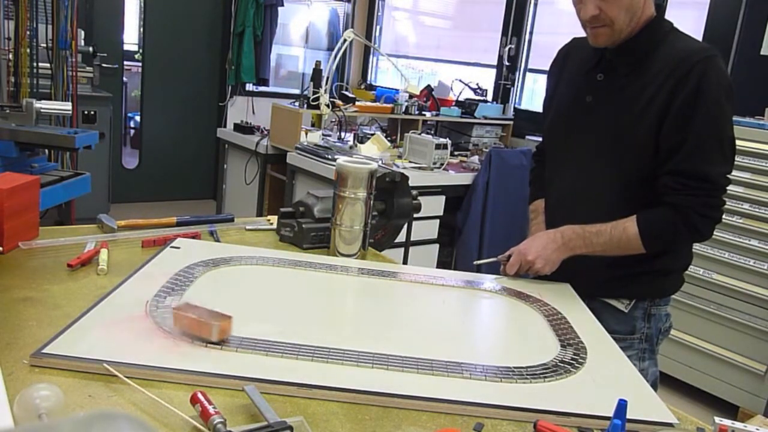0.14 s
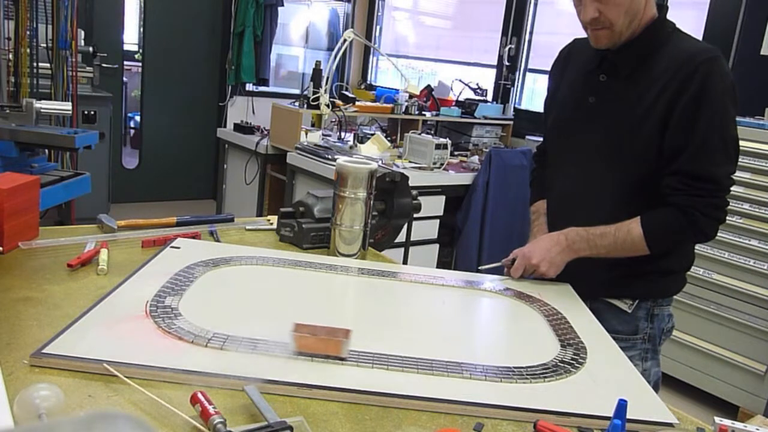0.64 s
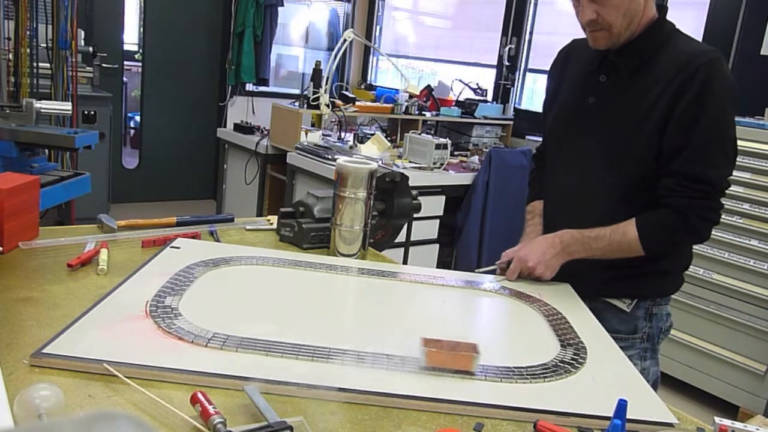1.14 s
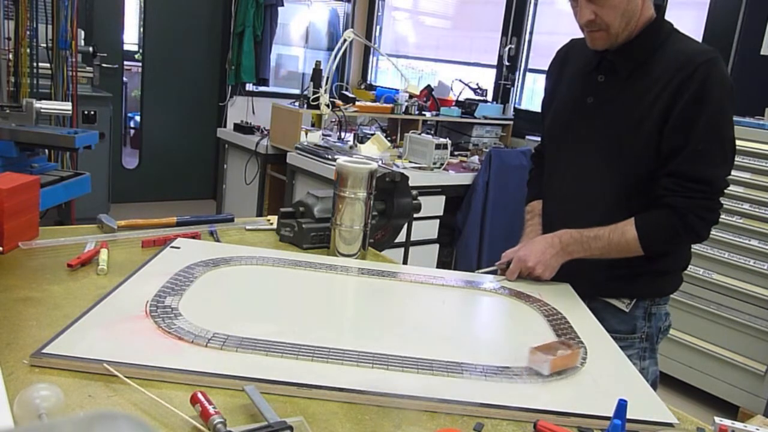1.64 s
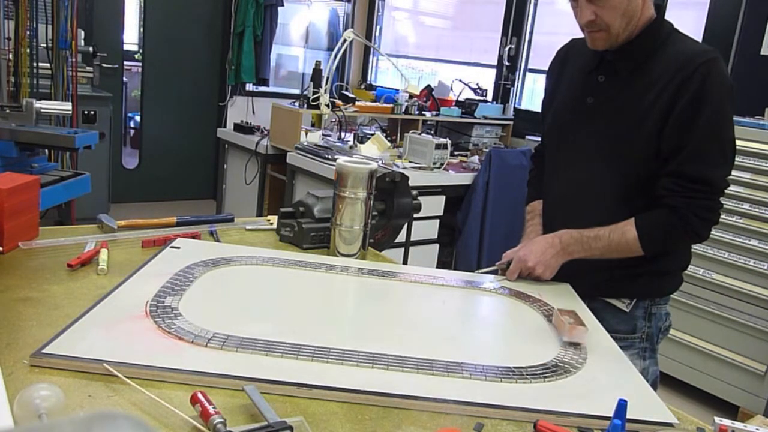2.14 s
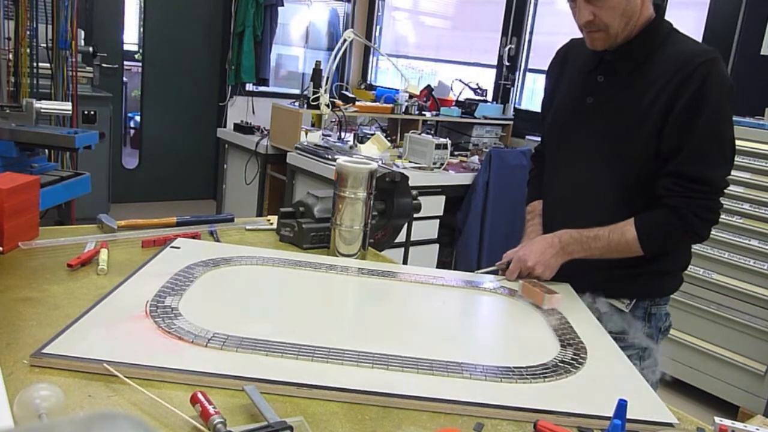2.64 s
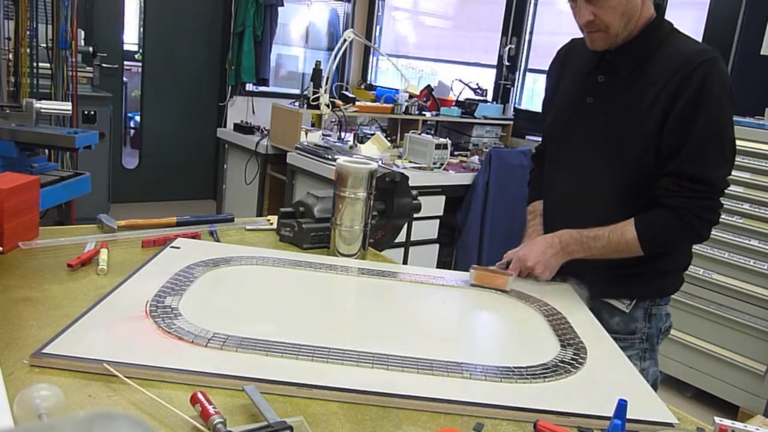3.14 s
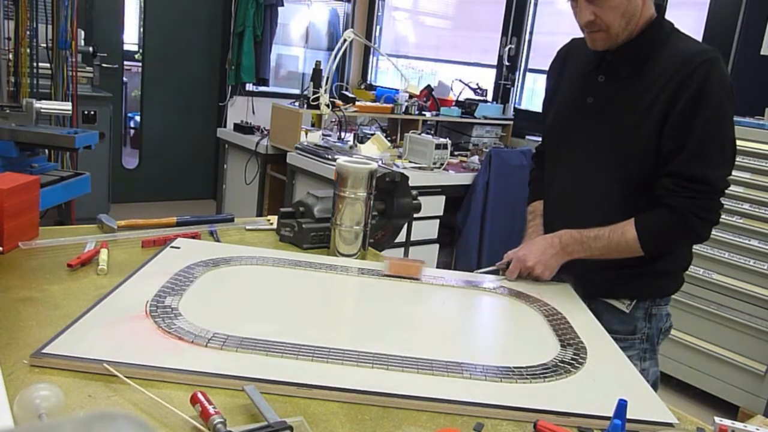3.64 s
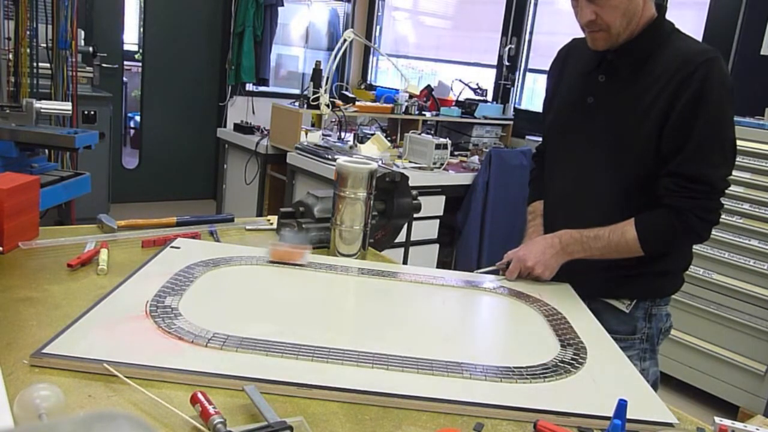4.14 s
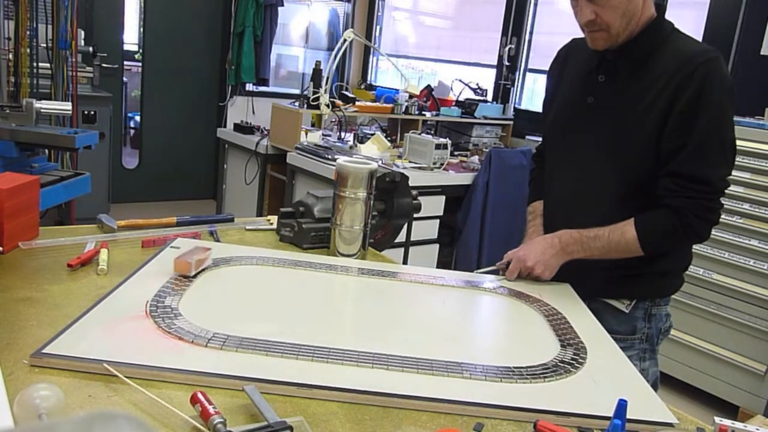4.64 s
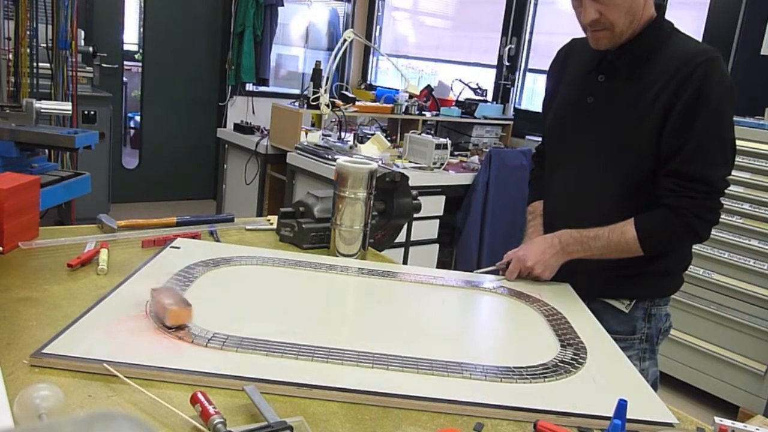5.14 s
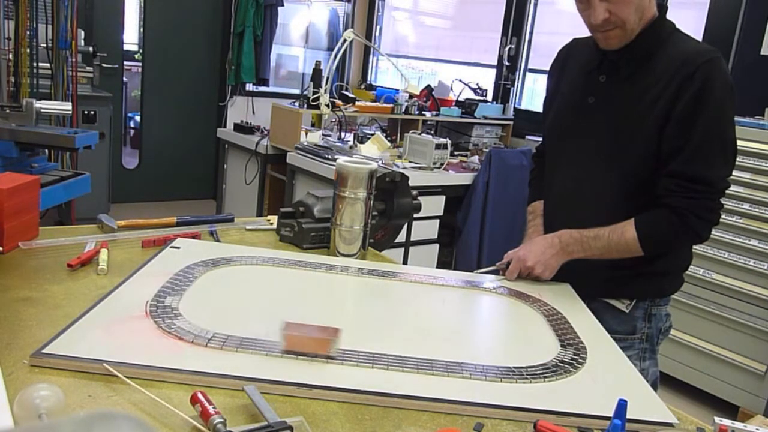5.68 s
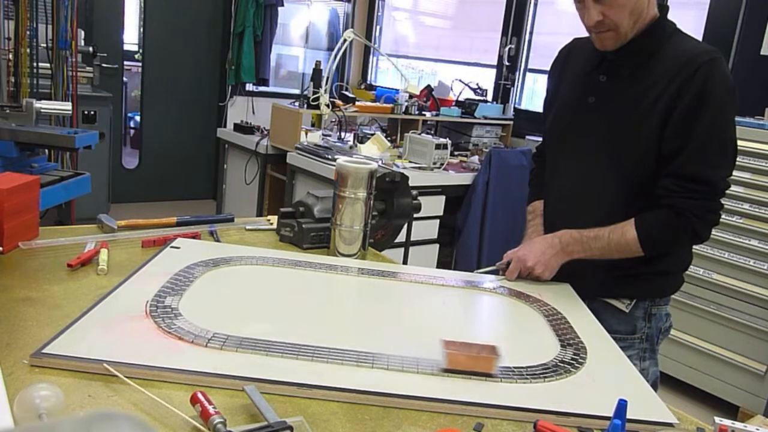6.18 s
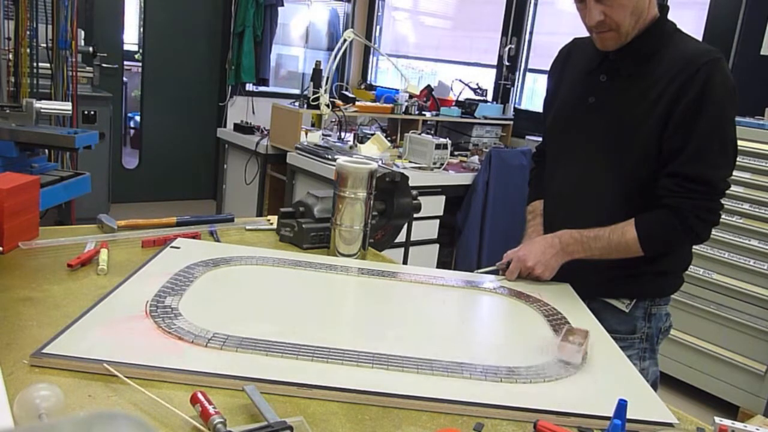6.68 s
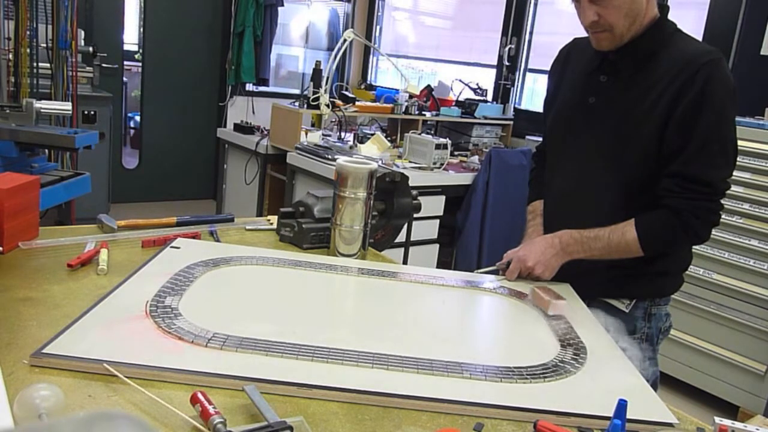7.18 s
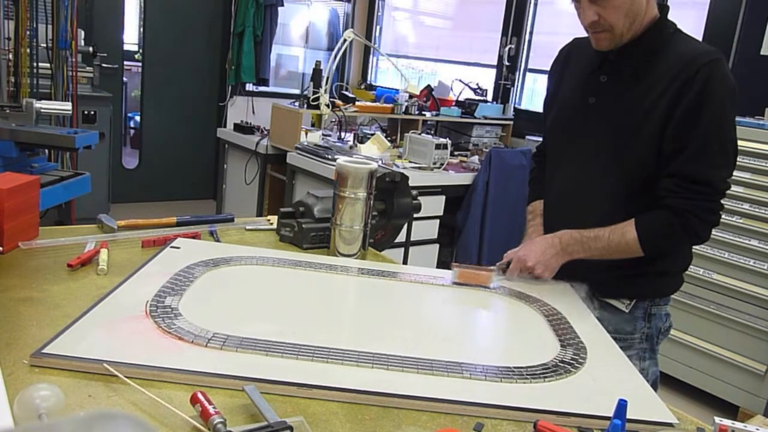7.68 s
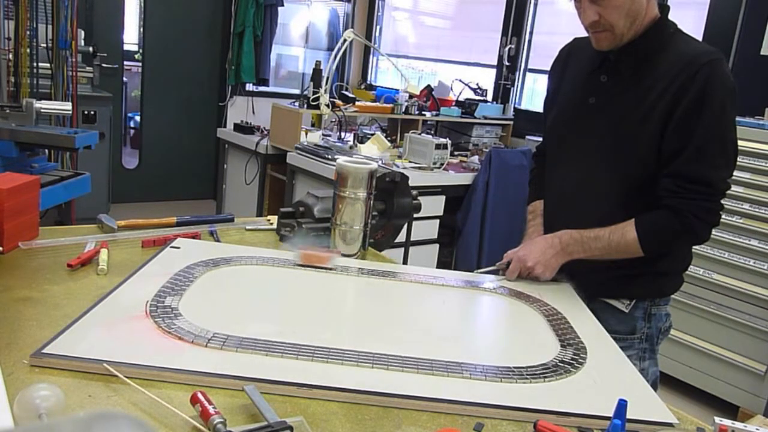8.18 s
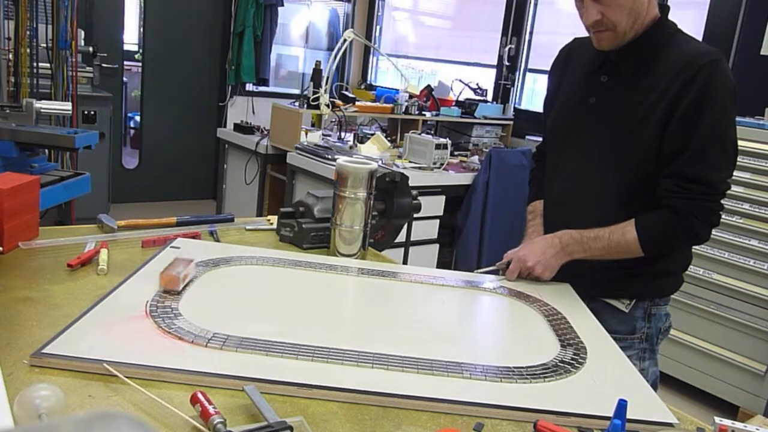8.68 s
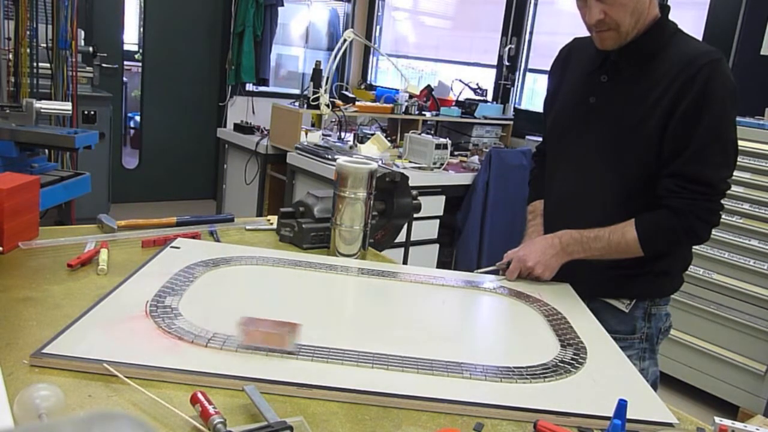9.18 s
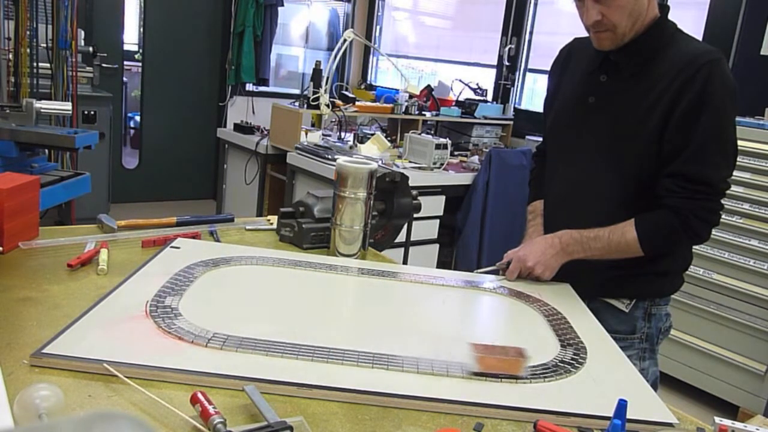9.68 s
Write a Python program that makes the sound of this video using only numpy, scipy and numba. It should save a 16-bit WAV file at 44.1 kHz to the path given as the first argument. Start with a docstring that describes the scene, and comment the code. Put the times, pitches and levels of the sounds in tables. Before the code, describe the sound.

In a workshop, low ventilation rumble runs alone for a second. A soft thud at the air gun, then a thin leak opens into a full bright hiss. It breaks off briefly, returns, dips once and holds. Twice a small open box crosses the jet, making a tearing roar that ends in a hollow boom. Small camera microphone a few metres away, treble cut off.

```python
"""Air gun and open box in a workshop

A hand-held air gun hisses over a table: a leak, then a full jet (shaped noise) with one break and one dip.
Twice a small open box runs through the jet: band-passed noise roars on its edges and booms in its hollow.
Table top and walls echo it (delays) over a low ventilation rumble; a small camera stands a few metres off."""
import sys
import numpy as np
from scipy import signal
from scipy.fft import rfft, irfft, next_fast_len
from scipy.io import wavfile
from scipy.ndimage import uniform_filter1d
from numba import njit

SR = 44100
rng = np.random.default_rng(int(sys.argv[2]) if len(sys.argv) > 2 else 0)


def voltage_ratio(decibels):
    """Convert decibels (scalar or array-like) to amplitude ratios, 20 dB per decade."""
    exponent = np.asarray(decibels, float) / 20
    return 10 ** exponent


def materialize(psi):
    """Save the field psi as 16-bit PCM at rate SR to the path in sys.argv[1].

    A 1-D psi becomes a single channel; in a 2-D psi each row is a channel.
    """
    bounded = np.clip(np.atleast_2d(psi).T, -1, 1)
    quanta = np.round(bounded * 32767).astype(np.int16)
    wavfile.write(sys.argv[1], SR, quanta)


N = 432621
T = np.arange(N) / SR


def unit(x):
    """Scale to rms 1."""
    return x / np.sqrt(np.mean(x ** 2))


def coloured(points):
    """Noise with a spectrum of (f/Hz, density/dB) points, straight in log f, rms 1."""
    hz, db = np.transpose(points)
    size = next_fast_len(N)
    bins_hz = np.arange(1, size // 2 + 2) * SR / size
    gain = voltage_ratio(np.interp(np.log(bins_hz), np.log(hz), db))
    white = rng.standard_normal(size)
    return unit(irfft(rfft(white) * gain, size)[:N])


def curves(rows):
    """Columns of a time table, read at every sample."""
    s, *columns = np.transpose(rows)
    return [np.interp(T, s, c) for c in columns]


def walk(rate_hz):
    """Random levels held 1 / rate_hz and slewed twice; spread near 1."""
    hold = int(SR / rate_hz)
    steps = np.repeat(rng.standard_normal(N // hold + 1), hold)
    return 0.87 * uniform_filter1d(uniform_filter1d(steps, hold), hold)[:N]


@njit
def svf(x, hz, width):
    """State-variable band-pass whose centre and width may move, gain 1 at the centre."""
    y, b, l = np.empty(len(x)), 0., 0.
    for i in range(len(x)):
        g, k = np.tan(np.pi * hz[i] / SR), width[i] / hz[i]
        v = (b + g * (x[i] - l)) / (1 + g * (g + k))
        b, l, y[i] = 2 * v - b, l + 2 * g * v, k * v
    return y


def noise_band(hz, width_hz, second_width_hz):
    """White noise through two band-passes at one fixed or moving centre."""
    still = np.zeros(N)
    once = svf(rng.standard_normal(N), hz + still, width_hz + still)
    return svf(once, hz + still, second_width_hz + still)


def along(enter_s, leave_s):
    """How far the box has gone through the jet, in box lengths."""
    return (T - enter_s) / (leave_s - enter_s)


# rumble level: t/s, level/dB
SHOP_LEVEL = [(0, -42.5), (2.1, -44.5), (2.6, -41.5), (5.4, -42.5), (6.0, -46), (9.81, -45)]
# middle of the background, relative spectrum: f/Hz, density/dB
RUMBLE_SPECTRUM = [(12, -51), (20, -19), (69, -17), (178, -4.5), (233, -2.5), (306, -10.5), (338, -8),
                   (374, -13), (413, -12), (445, -14), (1920, -33), (5450, -35), (7520, -48), (9780, -83),
                   (16500, -120)]
# side of the background, relative spectrum: f/Hz, density/dB
WIDE_SPECTRUM = [(12, -49.5), (20, -21.5), (227, -11), (491, -11), (529, -10), (1320, -12.5), (1500, -18),
                 (1780, -12.5), (2340, -16), (4810, -20.5), (7520, -37), (9780, -69), (16500, -120)]
WIDE_DB = -8  # side against middle


def shop():
    """Ventilation rumble in the middle; the faint hiss above it spreads wide, partly out of phase."""
    level = voltage_ratio(curves(SHOP_LEVEL)[0] + 1.0 * walk(2.1))
    side = voltage_ratio(WIDE_DB) * coloured(WIDE_SPECTRUM) * np.array([[1], [-1]])
    return level * (coloured(RUMBLE_SPECTRUM) + side)


@njit
def walls(x, lags, gain, damp):
    """Eight delay lines that feed each other, duller on every round."""
    line, soft, out = np.zeros((8, 4096)), np.zeros(8), np.zeros((2, len(x)))
    for i in range(len(x)):
        total = 0.
        for k in range(8):
            soft[k] += (1 - damp) * (gain[k] * line[k, (i - lags[k]) & 4095] - soft[k])
            total += soft[k]
            out[k % 2, i] += soft[k]
        for k in range(8):
            line[k, i & 4095] = x[i] + soft[k] - total / 4
    return out


# early echoes off table, body and benches: delay/ms, left gain, right gain
EARLY_ECHOES = [(0.977, 0.11, 0.021), (2.39, 0.024, 0.017), (2.68, 0.024, 0.018), (6.716, 0.014, 0.032),
                (7.2, 0.016, 0.014), (8.5, 0.038, 0.027), (9.23, 0.028, 0.028), (21.7, 0.055, 0.056)]
ROOM_T60_S, ROOM_DAMP, ROOM_DB = 0.33, 0.12, -12.5  # T60 before damping
PORTS_HZ, SIDE_DB, RIGHT_DB = 1900, 5.5, 0.85  # the two close ports hear nearly the same below PORTS_HZ


def room(near):
    """Direct sound, early echoes and diffuse tail, as two close microphone ports hear them."""
    response = np.zeros((2, 1200))
    response[:, 8] = 1  # direct sound; 8 samples of room for the sinc
    for ms, left, right in EARLY_ECHOES:
        response += np.outer([left, right], np.sinc(np.arange(1200) - 8 - ms * SR / 1000))
    early = signal.fftconvolve(near[None], response, axes=1)[:, 8:N + 8]
    lags = np.array([701, 887, 1063, 1279, 1487, 1693, 1931, 2213])  # samples
    tail = walls(near + 1e-18, lags, voltage_ratio(-60 * lags / SR / ROOM_T60_S), ROOM_DAMP)
    left, right = early + voltage_ratio(ROOM_DB) * tail
    mid = (left + right) / 2
    side = signal.lfilter(*signal.butter(1, PORTS_HZ, "high", fs=SR), (left - right) / 2)
    side = voltage_ratio(SIDE_DB) * side
    return voltage_ratio(-1.2) * np.array([mid + side, voltage_ratio(RIGHT_DB) * (mid - side)])


# the hand takes up the trigger: t/s, level/dB
TRIGGER_KNOCK = [(1.012, -33)]
KNOCK_HZ, KNOCK_WIDTH_HZ, KNOCK_T60_S = 686, 380, .4


def knock():
    """A dull, short thud: noise in one low resonance, with a soft start."""
    thud = unit(noise_band(KNOCK_HZ, KNOCK_WIDTH_HZ, 380))
    out = np.zeros(N)
    for s, db in TRIGGER_KNOCK:
        t = np.clip(T - s + .004, 0, None)  # starts 4 ms early
        envelope = (1 - np.exp(-t / 0.0017)) * 1000. ** (-t / KNOCK_T60_S)
        out += voltage_ratio(db) * envelope * thud / 3.3
    return out


# each pass of the box: front wall enters t/s, back wall leaves t/s,
# edge level/dB, lull of the edge roar/dB, wash level/dB, boom level/dB
BOX_PASSES = [(3.191, 3.516, -15, -7, -15.5, -26.5), (7.636, 7.856, -16, 0, -19.5, -28.5)]
# one pass: place/box lengths, edge roar/dB, wash/dB, hollow boom/dB
PASS_PROFILE = [(-.55, -18, -20, -25), (-.38, -10, -17.5, -27), (-.06, -10, -17.5, -23.5),
                (.04, -1.5, -12.5, -23.5), (.3, 0.5, -7, -22), (.62, -0.5, -10, -12.5),
                (.84, -0.5, -14.5, 0), (.95, -0.5, -4.5, -11.5), (1.15, -20, -12, -4),
                (1.65, -20.5, -19.5, -8), (2.0, -20.5, -18.5, -22.5)]
# fixed colour of microphone and table on the wash: f/Hz, width of first filter/Hz, level against the wash/dB
COLOUR_BANDS = [(2065, 220, -9), (3130, 390, -1)]
LULL_AT, LULL_SETS_IN, LULL_FADES = .4, 0.037, .3  # box lengths
EDGE_HZ, EDGE_SAG_HZ = 5180, 600  # centre at the front wall, and its fall once the jet is inside
WASH_HZ, FRONT_FALL_OCT, BACK_FALL_OCT = 2980, 0.78, 2.9  # falls in octaves per box length
BACK_AT = 0.906  # box lengths; the pitch resets
HOLLOW_HZ, HOLLOW_WIDTH_HZ = 420, 280
DULL_HZ = 6650  # edge roar and wash are dull above this


def box(enter_s, leave_s, level_db, lull_db, wash_level_db, hollow_db):
    """The jet tears on the box's edges, washes over its walls and blows across its hollow."""
    place = along(enter_s, leave_s)
    places, *columns = np.transpose(PASS_PROFILE)
    edge_db, wash_db, boom_db = (np.interp(place, places, c) for c in columns)
    fade = np.clip(np.minimum(place - places[0], places[-1] - place) / .3, 0, 1)
    gusts = voltage_ratio(0.46 * walk(45) + 2.0 * walk(600))

    # between the walls the edge roar slackens, then regains
    lull_width = np.where(place < LULL_AT, LULL_SETS_IN, LULL_FADES)
    edge_db = edge_db + lull_db * np.exp(-((place - LULL_AT) / lull_width) ** 2)
    edge_hz = EDGE_HZ - EDGE_SAG_HZ * np.clip(place / .35, 0, 1)
    edge = unit(noise_band(edge_hz, 1900, 2700))

    # the wash falls in pitch as front, then back wall move off into the wider, slower jet
    fall_oct = np.where(place < BACK_AT, FRONT_FALL_OCT * place, BACK_FALL_OCT * (place - BACK_AT))
    wash_hz = WASH_HZ * 2 ** -uniform_filter1d(np.clip(fall_oct, 0, 2.6), size=1000)
    # width in proportion to the centre, kept at even power as it narrows
    wash = unit(noise_band(wash_hz, 1.3 * wash_hz, 1.9 * wash_hz) / np.sqrt(wash_hz))
    colour = sum(voltage_ratio(db) * unit(noise_band(hz, w, 2 * w)) for hz, w, db in COLOUR_BANDS)
    # the fixed colour fades as the wash falls in pitch
    wash = wash + colour * np.clip(wash_hz / 1800 - .5, 0, 1)

    boom = unit(noise_band(HOLLOW_HZ, HOLLOW_WIDTH_HZ, 460))
    boom = voltage_ratio(hollow_db + boom_db + 2.2 * walk(30)) * boom
    roar = gusts * (voltage_ratio(level_db + edge_db) * edge + voltage_ratio(wash_level_db + wash_db) * wash)
    dulled = signal.sosfilt(signal.butter(8, DULL_HZ, fs=SR, output="sos"), roar)
    return fade * (dulled + boom)


# the free jet as the hand works the valve: t/s, hiss level/dB
VALVE_FLOW = [(1.056, -76), (1.086, -46.5), (1.114, -39.5), (1.26, -41.5), (1.344, -34), (1.44, -32.5),
              (1.53, -22.5), (1.61, -24.5), (2.285, -22.5), (2.344, -33.5), (2.494, -60), (2.516, -37),
              (2.566, -26.5), (2.94, -26), (3.6, -23), (4.67, -24), (4.74, -32), (4.91, -27), (5.31, -25),
              (5.42, -22), (5.9, -21.5), (6.2, -22.5), (7.5, -23), (8.0, -23), (8.22, -22.5), (8.248, -21),
              (8.31, -25.5), (8.5, -24), (9.81, -23.5)]
# full jet, relative spectrum: f/Hz, density/dB
HISS_SPECTRUM = [(530, -49.5), (900, -14), (1680, -13), (1910, -10), (2250, -11), (2480, -6), (2680, -8),
                 (3040, -4), (3500, -6.5), (5000, 0.5), (6130, -4), (6880, -9.5), (7190, -14.5),
                 (7520, -32), (9780, -65.5), (16500, -120)]
# large slow eddies, relative spectrum: f/Hz, density/dB
ROAR_SPECTRUM = [(150, -47.5), (250, -6), (289, -0.5), (448, 2), (627, 0.5), (752, -8), (918, -8.5),
                 (1670, -11), (2200, -5.5), (2860, -36), (4840, -120)]
# tube of the gun, heard at a small opening: f/Hz, width of first filter/Hz, level/dB
BARREL_MODES = [(2620, 680, -4.5), (3350, 430, -4.5), (4200, 570, -14), (4710, 420, 0.5), (5710, 160, 0),
                (6110, 300, -7.5), (6740, 350, -8)]
TUBE_LOW_HZ = 2240  # high-pass of the narrow tube
OPEN_DB, OPEN_SPAN_DB = -31.5, 3  # hiss level where the jet drowns the tube, and how gradually
LINGER_S = .11  # the broad jet dies away this long after the valve shuts
ROAR_DB, ROAR_SLOPE = -14.5, 0.4  # against a hiss of -24 dB; extra dB lost per dB of closing
BLOCKED_AT, BLOCKED_WIDTH, BLOCKED_ROAR_DB = .25, .25, -7  # first two in box lengths


def jet():
    """Turbulent hiss; a barely open valve rings the tube, a wide one gives a broad jet with a low roar."""
    hiss_db, = curves(VALVE_FLOW)
    lingering_db = np.maximum(hiss_db, np.interp(T - LINGER_S, T, hiss_db))
    wide = 1 / (1 + np.exp((OPEN_DB - lingering_db) / OPEN_SPAN_DB))
    tube = unit(sum(voltage_ratio(db) * noise_band(hz, w, 2.3 * w) for hz, w, db in BARREL_MODES))
    tube = signal.sosfilt(signal.butter(6, TUBE_LOW_HZ, "high", fs=SR, output="sos"), tube)
    # eddies come in sizes: slow swells from the hand, quick bursts from the shear layer
    eddies = voltage_ratio(0.9 * walk(7) + .5 * walk(60) + 0.75 * walk(700))
    hiss = eddies * (np.sqrt(wide) * coloured(HISS_SPECTRUM) + np.sqrt(1 - wide) * tube)
    # large eddies cannot grow while the box stands close in front of the tip
    blocked = sum(np.exp(-((along(*row[:2]) - BLOCKED_AT) / BLOCKED_WIDTH) ** 4) for row in BOX_PASSES)
    roar_db = ROAR_DB + ROAR_SLOPE * (hiss_db + 24.0) + BLOCKED_ROAR_DB * blocked + .5 * walk(25)
    roar = voltage_ratio(roar_db) * coloured(ROAR_SPECTRUM)
    started = T > VALVE_FLOW[0][0]
    return voltage_ratio(hiss_db) * started * (hiss + roar)


def scene():
    """Jet, box passes and knock in the room, over the background."""
    near = jet() + sum(box(*row) for row in BOX_PASSES) + knock()
    return room(near) + shop()


GAIN_TOP_DB, GAIN_SLOPE = -28, 0.32  # slope: dB lost per dB above the top
GAIN_ATTACK_S, GAIN_RELEASE_S = 0.13, 0.36


def gain_control(x):
    """Follows the power every 256 samples, quick to rise and slow to fall, and turns loud sound down."""
    power = uniform_filter1d(np.mean(x ** 2, axis=0), size=512)[::256]
    rise, fall = 1 - np.exp(-256 / SR / np.array([GAIN_ATTACK_S, GAIN_RELEASE_S]))
    held, e = [], power[0]
    for p in power:
        e += (p - e) * (rise if p > e else fall)
        held.append(e)
    over_db = np.maximum(10 * np.log10(held) - GAIN_TOP_DB, 0)
    return x * voltage_ratio(-GAIN_SLOPE * np.interp(T, T[::256], over_db))


TOP_HZ = 7620


def roll_off(x):
    """The treble ends steeply here."""
    return signal.sosfilt(signal.butter(12, 7670, fs=SR, output="sos"), x)


def record(dry):
    """The camera rides the gain and cuts the top steeply."""
    levelled = gain_control(dry)
    mix = signal.sosfilt(signal.ellip(10, .2, 75, TOP_HZ, fs=SR, output="sos"), levelled)
    return roll_off(mix)


dry = scene()
out = record(dry)
materialize(out)
```